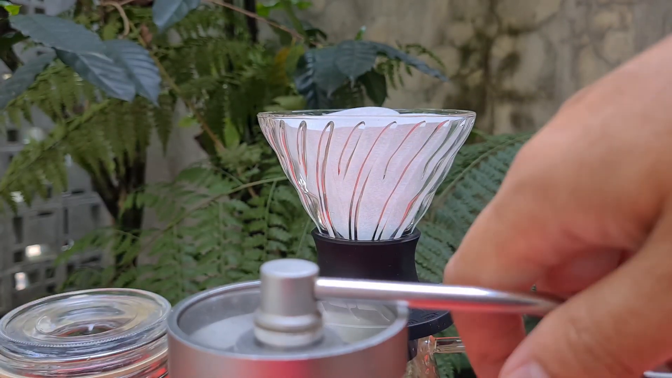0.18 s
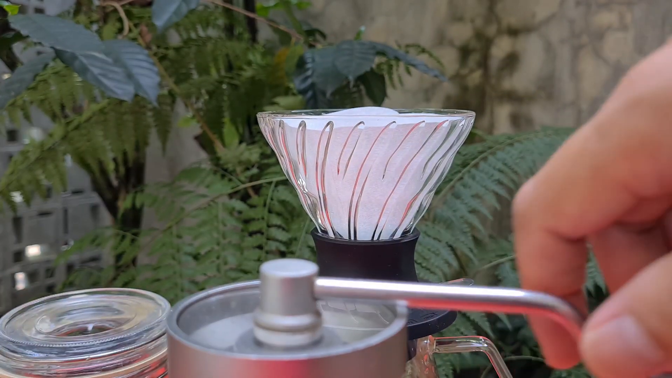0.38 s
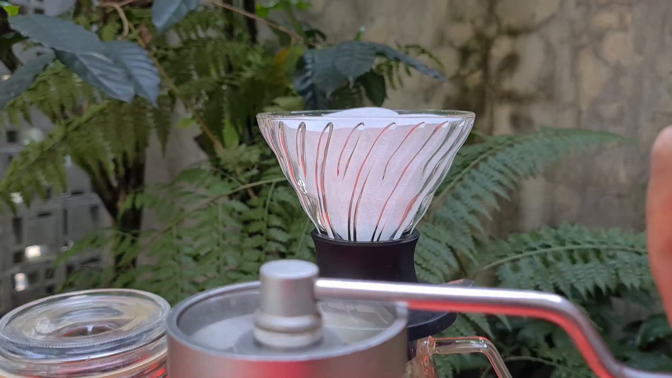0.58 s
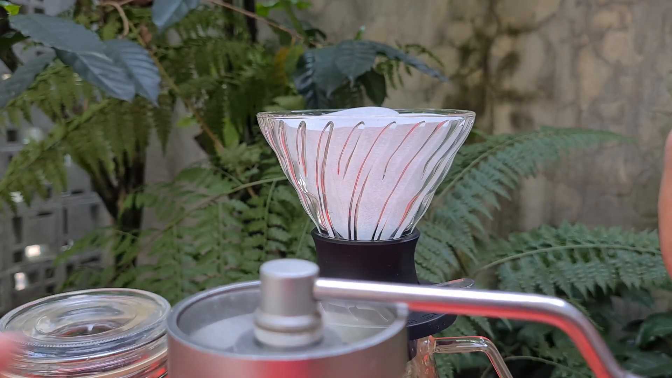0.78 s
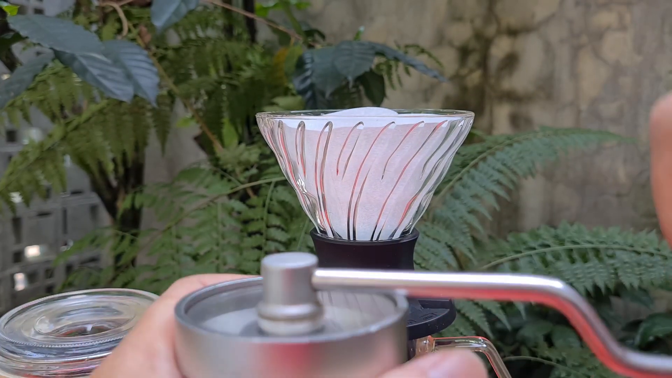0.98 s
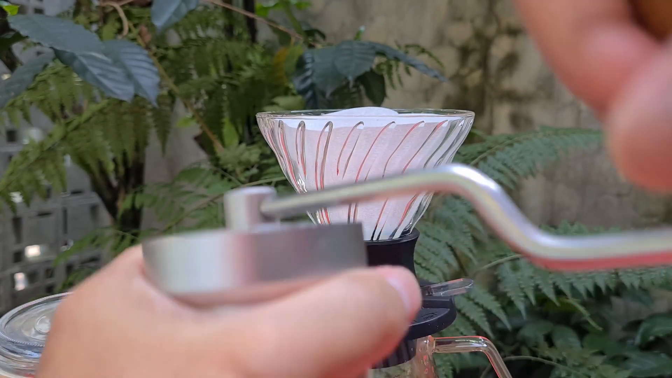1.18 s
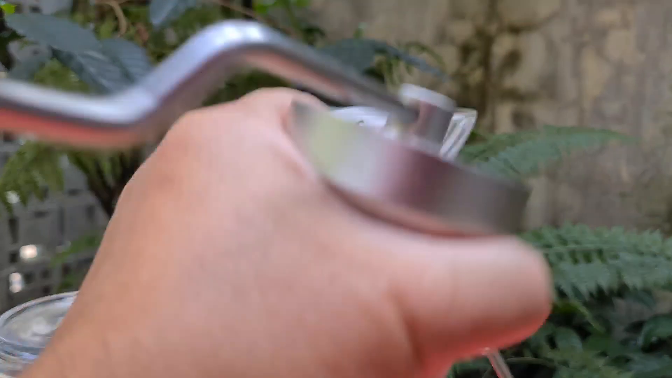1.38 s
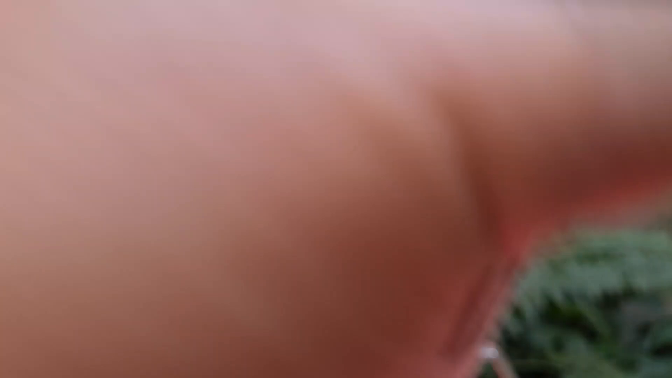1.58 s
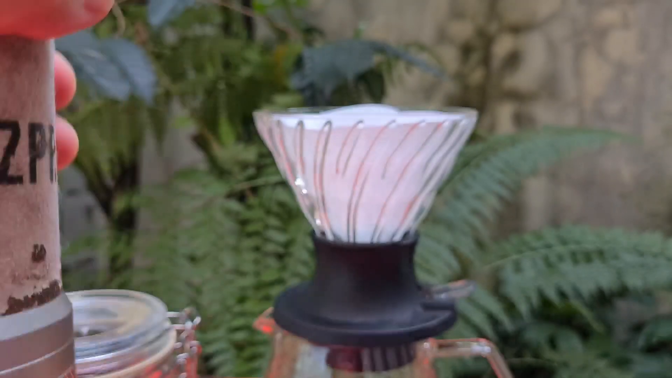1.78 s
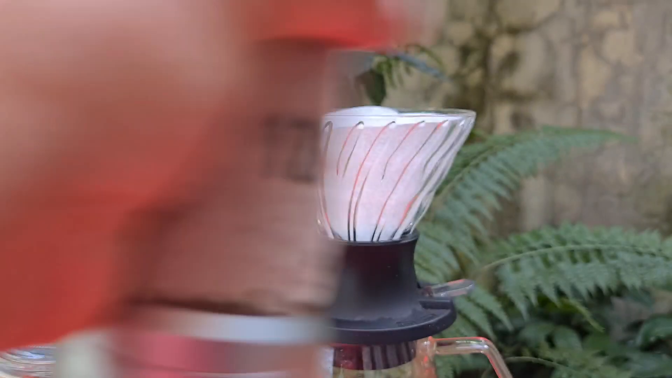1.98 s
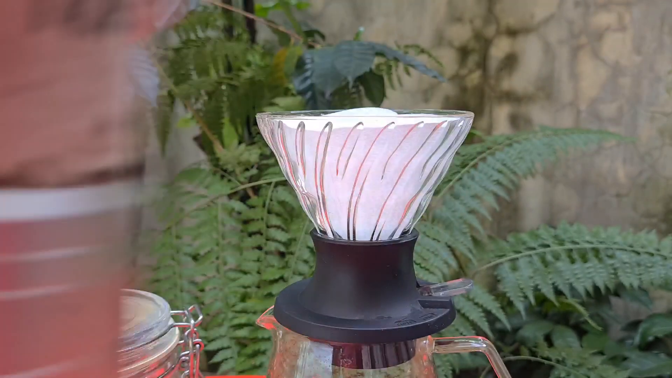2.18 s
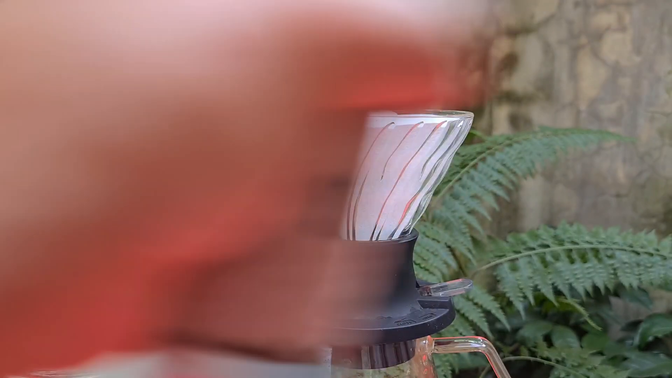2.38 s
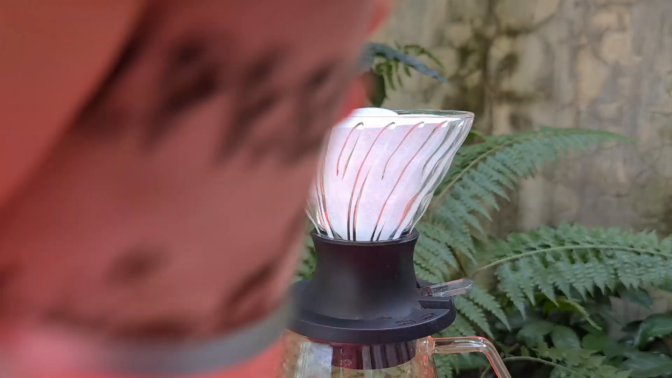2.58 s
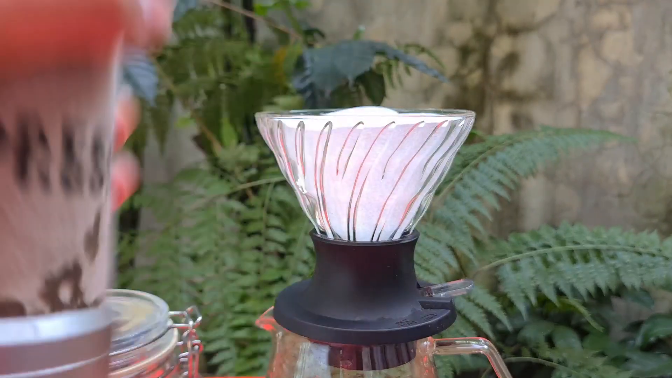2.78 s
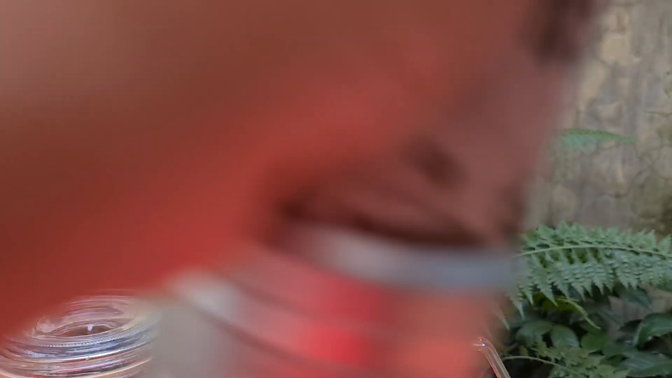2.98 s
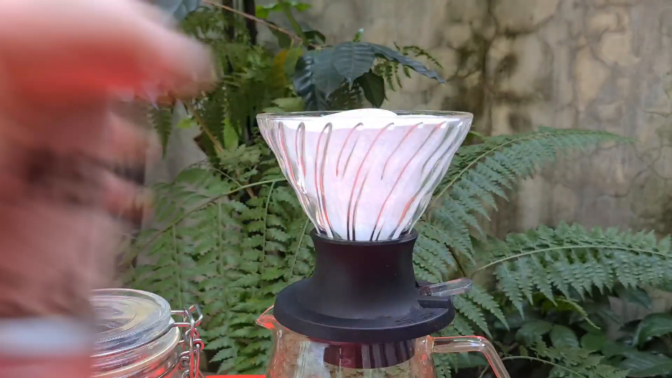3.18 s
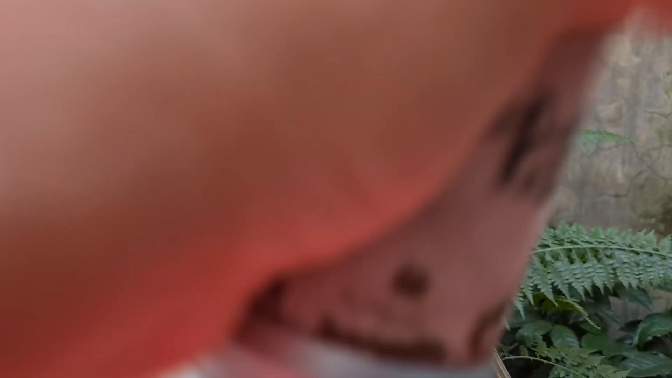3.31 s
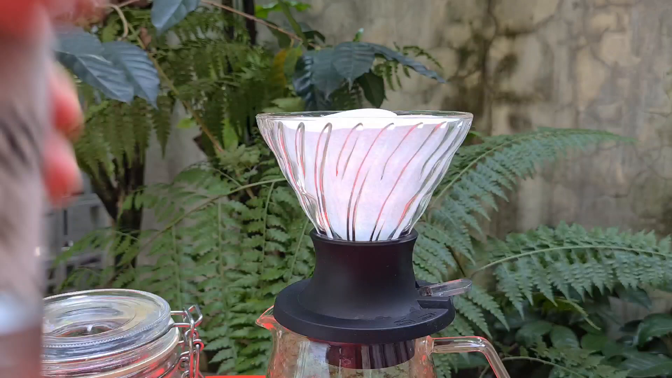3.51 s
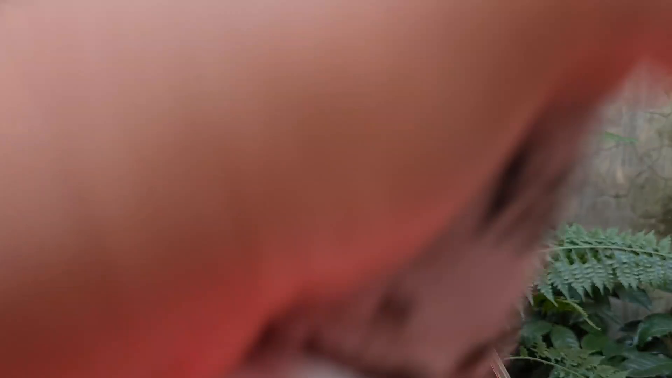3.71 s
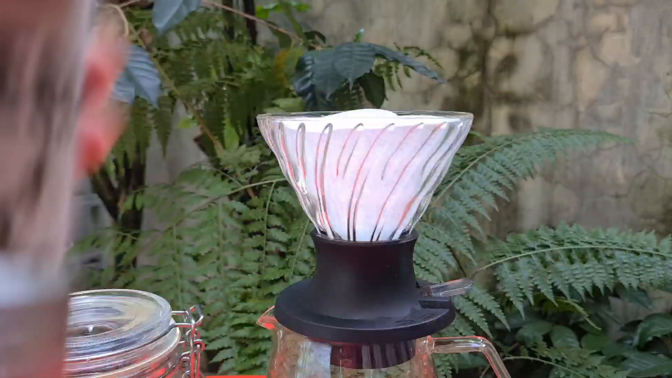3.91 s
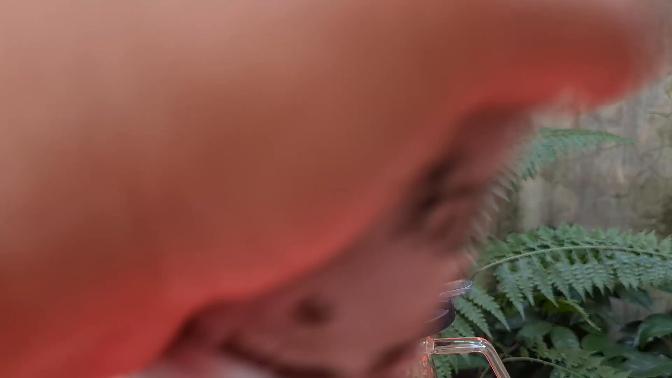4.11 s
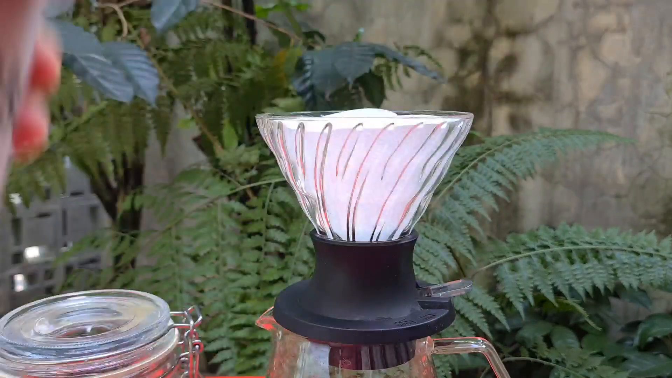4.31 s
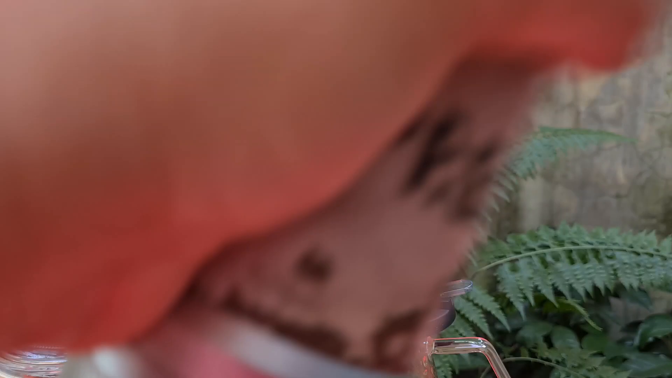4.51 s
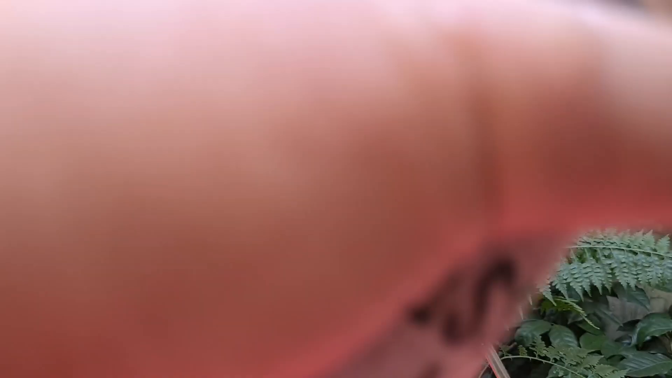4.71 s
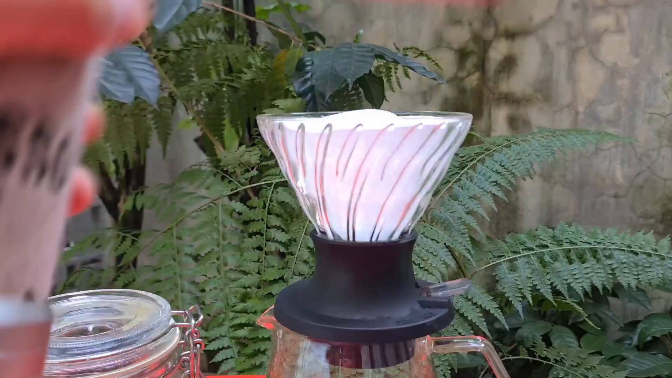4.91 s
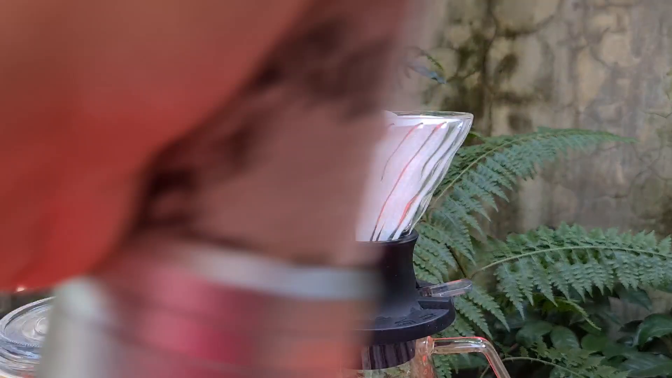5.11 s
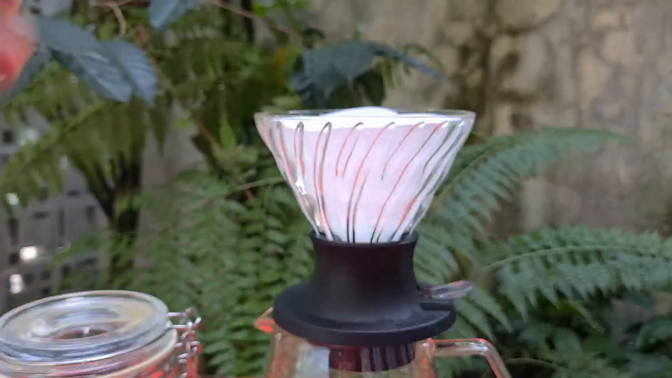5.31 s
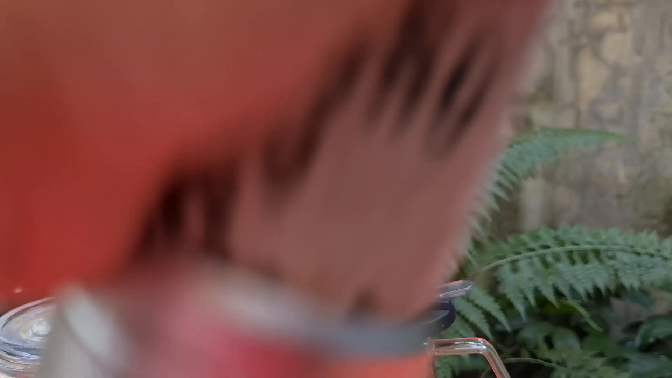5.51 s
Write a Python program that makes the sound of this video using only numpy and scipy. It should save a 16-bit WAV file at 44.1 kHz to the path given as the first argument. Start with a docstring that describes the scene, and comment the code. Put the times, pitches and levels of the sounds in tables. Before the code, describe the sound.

A steel hand grinder is bumped on a table, lifted, then cranked close by, crunching and cracking coffee beans in uneven pushes outdoors.

```python
"""Hand grinder in a garden

A steel hand grinder is lifted off a table and cranked close by: random fractures, as clicks, ring its body.
At each push the axle judders, then beans crunch, spray splinters and snap; the hands add a low shudder and
the crank stalls now and then. Early bumps thud and ring the table's modes, and touches brush the body.
Behind: filtered-noise air, an on-and-off insect as narrow-band clicks, a faint rising sine whistle, echoes."""
import sys
import numpy as np
from scipy import signal
from scipy.fft import rfft, irfft, next_fast_len
from scipy.io import wavfile
from scipy.ndimage import uniform_filter1d, minimum_filter1d

SR = 44100
rng = np.random.default_rng(int(sys.argv[2]) if len(sys.argv) > 2 else 0)


def wrap_up_sound(samples):
    """Save the sound to the file named by the first command line argument, as 16-bit audio."""
    columns = np.atleast_2d(samples).T
    # keep every value between -1 and 1, then stretch to whole-number steps
    tamed = np.clip(columns, -1, 1)
    steps = np.round(tamed * 32767).astype(np.int16)
    wavfile.write(sys.argv[1], SR, steps)


N = 250929
TIME = np.arange(N) / SR


def gain_of(db):
    """Decibels to amplitude."""
    return 10 ** (np.asarray(db) / 20)


def evened(x):
    """Scales to an rms of 1."""
    return x / np.sqrt(np.mean(x ** 2) + 1e-20)


def read(points, hz):
    """Interpolates a table on a log-frequency axis."""
    f, value = np.transpose(points)
    return np.interp(np.log(hz + 1), np.log(f + 1), value)


def add(mix, start_s, sound):
    """Lays a two-channel sound into the mix."""
    part = mix[:, max(round(start_s * SR), 0):][:, :sound.shape[1]]
    part += sound[:, :part.shape[1]]


def colour(x, spectrum, size=4096):
    """Minimum-phase filter with the given spectrum: clicks keep their sharp fronts."""
    hz = abs(np.fft.fftfreq(size, 1 / SR))
    log_gain = np.log(gain_of(read(spectrum, hz)))
    taps = np.fft.ifft(np.exp(signal.hilbert(log_gain).conj())).real[:size // 2]
    return signal.oaconvolve(x, taps[None], axes=1)[:, :x.shape[1]]


def steadied(x, window_s):
    """Holds the mean power near 1, leaving the faster grain alone."""
    size = max(int(window_s * SR), 2)
    power = uniform_filter1d(uniform_filter1d((x ** 2).mean(0), size), size)
    return x / np.sqrt(abs(power) + 1e-12)


def grit(per_s, count=N):
    """Tiny clicks of random size and sign, unrelated between the channels."""
    return rng.standard_normal((2, count)) * (rng.random(count) < per_s / SR)


def swell(peak_s, sigma_s):
    """A Gaussian rise and fall around a moment."""
    return np.exp(-.5 * ((TIME - peak_s) / sigma_s) ** 2)


# phase by which left leads right: f/Hz, lead/rad
LEAD = [(60, 0.098), (400, 0.17), (600, 2.14), (800, 1.9), (1000, 0.28), (1250, 1.26), (1450, 2.74),
        (2600, 2.08), (3100, 4.7), (4000, 9.95), (6000, 12.6)]
# left over right: f/Hz, level/dB
BALANCE = [(50, 5.5), (200, 3), (400, 1.5), (550, 1.3), (700, 5), (950, 4.5), (1220, -0.4), (1700, 2.5),
           (2600, 0.2), (5300, -1.1), (6400, -2.5), (7500, 0.5), (8300, 3.9), (9500, -0.2)]


def ports(x, likeness):
    """Two microphone ports: two unrelated signals are blended by likeness, phase lead and balance."""
    size = next_fast_len(N + 4096)
    a, b = rfft(x, size)
    hz = np.fft.rfftfreq(size, 1 / SR)
    same = np.clip(read(likeness, hz), 0, 1)
    lean = gain_of(read(BALANCE, hz) / 2)
    right = (same * a + np.sqrt(1 - same ** 2) * b) * np.exp(-1j * read(LEAD, hz))
    level = np.sqrt(2 / (lean ** 2 + lean ** -2))
    return irfft(np.array([a * lean, right / lean]) * level, size)[:, :N]


# garden air spectrum, relative: f/Hz, level/dB
GARDEN = [(20, -9), (45, -2), (90, -1.5), (160, .5), (270, -8), (430, -16.5), (700, -21), (1050, -21),
          (1500, -33), (2300, -35), (3100, -29), (5200, -31), (7200, -31.5), (8200, -44), (16000, -47)]
# port likeness of the air: f/Hz, likeness (0 to 1)
GARDEN_LIKENESS = [(130, 0.82), (290, 0.72), (640, 0), (1400, 0)]


def garden_air(level_db=-44.5):
    """Distant rumble and hiss: coloured noise, alike at both ports only in the lows."""
    air = evened(colour(rng.standard_normal((2, N)), GARDEN, size=8192))
    return ports(gain_of(level_db) * air, GARDEN_LIKENESS)


# buzzes, before the insect's gain: start t/s, level/dB
INSECT = [(-.04, -55), (.47, -51.5), (.96, -50.5), (2.52, -53)]


def insect(gain_db=3.0, rise_s=0.061, fade_after_s=0.15, fade_db_per_s=105):
    """A far insect: dense clicks in a narrow band near 6.5 kHz that swell and fade."""
    calls = 0
    for start_s, db in INSECT:
        age_s = TIME - start_s
        fade_db = fade_db_per_s * np.maximum(age_s - fade_after_s, 0)
        calls = calls + np.clip(age_s / rise_s, 0, 1) * gain_of(db - fade_db)
    band = [(5500, -22), (6100, -10), (6450, 3.5), (6650, 1), (6900, -15), (7600, -31)]  # f/Hz, level/dB
    return evened(colour(grit(2600), band)) * gain_of(gain_db) * calls


def walls(x, t60_s=0.21, wet_db=-16):
    """Faint scattered echoes from the table and the garden wall: sparse decaying taps."""
    t = np.arange(SR // 3) / SR
    taps = grit(2400, count=len(t)) * gain_of(-60 * t / t60_s) * (t > .0028)
    taps /= np.linalg.norm(taps, axis=1, keepdims=True)
    return x + gain_of(wet_db) * signal.oaconvolve(x, taps, axes=1)[:, :N]


def whistle(start_s=1.02, end_s=1.3, start_hz=2400, hz_per_s=2300, start_db=-55, db_per_s=82):
    """A faint rising whistle, perhaps a far bird: a swelling sine roughened by slow noise."""
    t = np.clip(TIME, start_s, end_s) - start_s
    sounding = uniform_filter1d(1. * (TIME > start_s) * (TIME < end_s), size=800)
    flutter = evened(uniform_filter1d(uniform_filter1d(rng.standard_normal((2, N)), 200), 130))
    tone = np.sin(2 * np.pi * np.cumsum(start_hz + hz_per_s * t) / SR)
    return sounding * gain_of(start_db + db_per_s * t) * flutter * tone


# bumps on the table: t/s, level/dB (before ring and thud gains), brightness corner f/Hz, click level/dB
BUMPS = [(0.42, -20, 560, -44), (0.4263, -23, 760, -45), (0.5094, -12.5, 1230, -23),
         (0.5155, -17.5, 1010, -30), (0.582, -37, 1200, -31.5)]
# table modes, relative: f/Hz, level/dB, t60/s
TABLE = [(91, 0, .26), (120, -3, .2), (162, 0, .28), (190, -3, .2), (258, -8, .28), (323, -9, .36),
         (352, -9, .26), (453, -5, .2), (613, -10, .12), (744, -11, .12), (1211, -17, .24)]
# thud spectrum, relative: f/Hz, level/dB
THUD = [(30, -20), (80, -4.5), (165, 4), (330, -5), (480, -10), (650, -15), (1200, -23.5), (2500, -60)]


def table_ring(t, corner_hz):
    """Decaying sines at the table's modes, duller for a lower corner."""
    ring = 0
    for k, (hz, level_db, t60_s) in enumerate(TABLE):
        decay = gain_of(level_db - 60 * t / t60_s) / np.hypot(1, hz / corner_hz)
        ring = ring + (-1) ** k * decay * np.sin(2 * np.pi * hz * t)
    return ring


def table(ring_db=-5, thud_db=-5, thud_t60_s=.22, lift_s=1.005, lift_db=-28, lift_hz=77, lift_t60_s=.34):
    """Bumps excite modes, a noise thud and a click; lifting the grinder off leaves a low decaying sine."""
    out, t = np.zeros((2, N)), np.arange(SR // 2) / SR
    click_band = [(150, 0.5), (700, 2.0), (1400, -3.0), (2200, -16),
                  (3300, -13.5), (5000, -34), (15000, -46)]  # f/Hz, level/dB
    for start_s, db, corner_hz, click_db in BUMPS:
        ring = table_ring(t, corner_hz)
        thud = steadied(colour(rng.standard_normal((1, len(t))), THUD), 0.066)
        thud = thud * gain_of(-60 * t / thud_t60_s)
        boom = gain_of(db) * (gain_of(ring_db) * ring + gain_of(thud_db) * thud)
        boom = boom * (1 - np.exp(-t / 0.0037))
        rattle = rng.standard_normal((2, len(t))) * gain_of(-60 * t / .075)
        click = colour(rattle, click_band)
        add(out, start_s, boom + gain_of(click_db) * click / click[:, :SR // 50].std())
    lift = gain_of(lift_db - 60 * t / lift_t60_s) * np.sin(2 * np.pi * lift_hz * t)
    add(out, lift_s, lift * np.ones((2, 1)))
    return out * gain_of([[1.3], [-1.3]])  # left louder


def body(x, modes):
    """Hollow body: air resonances as decaying cosines, band-passed, convolved with the blows."""
    t = np.arange(SR // 10) / SR
    ring = 0
    for hz, width_hz, db in modes:
        ring = ring + gain_of(db) * width_hz * np.exp(-np.pi * width_hz * t) * np.cos(2 * np.pi * hz * t)
    ring = signal.sosfilt(signal.butter(2, [560, 1450], "band", fs=SR, output="sos"), ring)
    return signal.oaconvolve(x, ring[None], axes=1)[:, :x.shape[1]]


# touches of fingers and loose crank: t/s, level/dB (body ring), swell time/s
TAPS = [(0.341, -57, 0.065), (0.916, -52.5, 0.0035), (0.993, -43.5, 0.0065), (1.002, -40, 0.0008),
        (1.103, -46, 0.0065), (1.156, -47, 0.0036), (1.426, -32, .016), (4.676, -51, 0.005)]
# lower and upper air resonances of the body, relative: f/Hz, width/Hz, level/dB
BODY = [(567.7, 45, -8), (937.3, 22, 1.5), (974.7, 51.7, 6)]
UPPER_BODY = [(1103, 42, -5.5), (1189, 71, -4.5)]
# crunching beans' spectrum, relative: f/Hz, level/dB
CRUNCH = [(450, -34), (800, -27), (1300, -4), (1520, 2.5), (1820, 7.5), (2060, 0.5), (2290, 4), (2650, 0.5),
          (3150, -3), (3800, -3), (4700, -4), (5400, -19), (7000, -47.5)]


def handling(scrape_db=-9):
    """Fingers and the loose crank brush the body: swelling grit rings it, with a little scrape."""
    out, t = np.zeros((2, N)), np.arange(SR // 6) / SR
    for start_s, db, swell_s in TAPS:
        rub = grit(7000, count=len(t)) * t * np.exp(-t / swell_s)
        ring = evened(body(rub, BODY + UPPER_BODY))
        scrape = gain_of(scrape_db) * evened(colour(rub, CRUNCH))
        add(out, start_s, gain_of(db) * (ring + scrape))
    return out


# whole-bean snaps, before the gains in snaps(): t/s, crack level/dB, body ring level/dB
SNAPS = [(1.1462, -13.5, -16), (1.1742, -6.5, -4.5), (1.2349, -7.5, -7.5), (1.2774, -6.5, -10),
         (1.2957, -10, -12), (1.3262, -7, -13), (1.3519, -22, -4), (1.4638, -9, -8), (1.478, -8, -8),
         (1.4849, -4, -9), (1.5503, -8, -6.5), (1.7429, -10, -19), (2.1705, -5.5, -20), (2.377, -7, -9.5),
         (2.4626, -7, -10), (2.6834, -9, -12), (2.7054, -11, -8), (2.7581, -5, -19), (2.7684, -3, -22),
         (2.9003, -3, -15), (2.9248, -4, -12.5), (3.2141, -9.5, -13), (3.2715, -7, -18),
         (3.2854, -10, -16.5), (3.3504, -21, -6), (3.9628, -11, -15.5), (4.4029, -14, -19),
         (4.4422, -25, -13), (4.4823, -4.5, -9.5), (4.6963, -14, -13.5), (4.7694, -8.5, -12),
         (4.8457, -8, -22), (5.005, -14, -23.5), (5.214, -9, -10.5), (5.459, -10, -8)]
# spectra of burr chamber, splinters and axle judder, relative: f/Hz, level/dB
CHAMBER = [(1700, -21.5), (2350, -5), (2780, -0.5), (3150, 0.5), (3450, -4), (3900, -19.5), (5500, -35)]
SPLINTERS = [(3500, -34), (4750, -0.5), (5300, 4), (5750, -2), (6050, -0.5), (6500, -4), (7150, -0.5),
             (7850, -6), (8600, -0.5), (9400, -3), (10800, -8.5), (13000, -10), (16000, -19.5)]
JUDDER = [(60, -21), (125, -14), (166, 0), (205, -1), (250, -2), (320, 0.5), (400, -10), (550, -14),
          (700, -20)]


def snaps(ring_db=-9.0, crack_db=-17, jolt_db=-21):
    """Whole beans burst in a few ms of sharp cracks that ring the body and jolt the axle."""
    out, t = np.zeros((2, N)), np.arange(SR // 30) / SR
    crumble = np.exp(-t / .0027) * np.minimum(t / .0004, 1)
    for start_s, crack_level_db, ring_level_db in SNAPS:
        burst = grit(16000, count=len(t)) * crumble
        crack = evened(colour(burst, CRUNCH))
        crack += gain_of(-14) * evened(colour(burst, CHAMBER))
        crack += gain_of(-3.0) * evened(colour(burst, SPLINTERS))
        ring = evened(body(burst, BODY + UPPER_BODY))
        ring += gain_of(jolt_db) * evened(colour(burst, JUDDER))
        snap = gain_of(ring_level_db + ring_db) * ring
        add(out, start_s, snap + gain_of(crack_level_db + crack_db) * evened(crack))
    return out


def fractures(per_s, spread_db, tau_s):
    """Envelope of random breaks of unequal size, each crumbling away exponentially."""
    size = gain_of(spread_db * np.minimum(rng.exponential(1, N), 3.5)) * (rng.random(N) < per_s / SR)
    power = signal.lfilter([1], [1, -np.exp(-2 / (tau_s * SR))], size ** 2)
    return evened(np.sqrt(power))


def shifting(x, depth_db, width_hz, width_s):
    """Each bean sits and breaks differently: time-frequency patches of random gain."""
    z = signal.stft(x, nperseg=512, noverlap=384)[2]
    across = np.exp(-(np.arange(-12, 13) * SR / 512 / width_hz) ** 2)
    along = np.exp(-(np.arange(-40, 41) * 128 / SR / width_s) ** 2)
    noise = rng.standard_normal(z.shape[1:])
    patches = evened(signal.fftconvolve(noise, np.outer(across, along), "same"))
    return signal.istft(z * gain_of(depth_db * patches), nperseg=512, noverlap=384)[1][:, :N]


# stretches in which the crank turns: start t/s, stop t/s
TURNS = [(1.17, 1.378), (1.454, 1.744), (1.771, 2.5), (2.672, 4.543), (4.69, 4.963), (5.008, 5.65)]


def turning(fall_db_per_s, bite_s=0.015):
    """Gain of 1 while the crank turns: quick bite, dying away after each stop."""
    stretches = []
    for start_s, stop_s in TURNS:
        bite = np.clip((TIME - start_s) / bite_s, 0, 1)
        stretches.append(bite * gain_of(-fall_db_per_s * np.maximum(TIME - stop_s, 0)))
    return np.max(stretches, 0)


# pushes on the crank, before the gains in grinding(): t/s, delay to hardest crushing/s, crushing sigma/s,
# crunch level/dB, low ring level/dB, upper ring level/dB, strain in the hands (relative) level/dB
PUSHES = [(1.18, .005, .028, -18, -14.5, -20, -5), (1.3, 0.019, 0.07, -29.5, -18, -23, -3),
          (1.472, 0.046, .1, -24, -15.5, -16, 1.5), (1.71, 0.0046, 0.046, -23.5, -18, -25, -2),
          (1.955, 0.14, 0.061, -25.5, -21.5, -17, 3), (2.37, 0.063, 0.047, -23.5, -22.5, -22, 3),
          (2.72, 0.014, .045, -19.5, -18, -23.5, -1.5), (2.894, 0.094, 0.091, -23.5, -21.5, -22, 0),
          (3.25, .085, 0.089, -22.5, -17.5, -22, 1), (3.66, 0.13, 0.09, -23.5, -22, -26.5, 2),
          (4.04, .097, 0.051, -22, -20, -17.5, 3), (4.44, 0.052, 0.027, -24, -20, -21.5, 0),
          (4.715, 0.032, 0.067, -19.5, -18, -24, -1), (5.08, 0.089, 0.094, -22, -19.5, -22, -1),
          (5.452, 0.092, 0.067, -21.5, -22.5, -22.5, 0)]


def strain(delay_s, sigma_s, peak_db, rest_db, relax_db_per_s=100):
    """Tremor gain: swells around each push, relaxes when the crank stops."""
    power = gain_of(rest_db) ** 2
    for push_s, *_, strain_db in PUSHES:
        power = power + (gain_of(peak_db + strain_db) * swell(push_s + delay_s, sigma_s)) ** 2
    return np.sqrt(power) * turning(relax_db_per_s)


# steady feed between pushes as the burrs fill and empty, before the gains in grinding(): t/s, level/dB
FEED = [(1.2, -39.5), (1.9, -26.5), (2.3, -25), (3.13, -32), (3.48, -23.5), (3.98, -23.5), (4.35, -26),
        (4.95, -30.5), (5.35, -27.5), (5.69, -24)]


def crank_levels(ring_db=2, upper_db=-4, usual_db=-24, splinter_db=-6, splinter_growth_db_per_db=0.79):
    """Gains of low ring, upper ring, crunch and splinters: pushes swell above the steady feed."""
    feed_db = np.interp(TIME, *np.transpose(FEED))
    gains = gain_of([feed_db, feed_db + ring_db, feed_db + upper_db])
    for push_s, delay_s, sigma_s, *peaks_db, _ in PUSHES:
        gains = np.hypot(gains, gain_of(peaks_db)[:, None] * swell(push_s + delay_s, sigma_s))
    crunch, ring, upper = gains
    # splinters stand splinter_db from the crunch when it is at usual_db
    growth = (crunch / gain_of(usual_db)) ** splinter_growth_db_per_db
    splinters = gain_of(usual_db + splinter_db) * growth
    moving = turning(650)
    trickle = gain_of(-13.5) * turning(125)  # grounds still falling after a stop
    falling = np.maximum(moving, trickle)
    return ring * moving, upper * moving, crunch * falling, splinters * falling


# burr chamber resonance near 3 kHz against the plain crunch: t/s, level/dB
SETTLING = [(1.2, -16), (1.55, -23), (1.85, -11), (2.35, -13), (2.75, -8), (3.1, -13), (3.4, -5), (3.7, -3),
            (4.0, -2.5), (4.3, -8), (4.55, 4), (4.72, 1.5), (4.92, -9), (5.3, -13), (5.62, -3.5)]
# low shudder spectrum, relative: f/Hz, level/dB
SHUDDER = [(10, -13.5), (25, -3.5), (48, 5.5), (80, -4.5), (115, -10), (170, -12), (400, -64.5)]
# answer to a push, before strain and gain: delay/s, sigma/s, peak level/dB, rest level/dB
SHUDDER_SWELL = (0.07, 0.07, -34.5, -56)
JUDDER_SWELL = (-0.04, 0.002, -35.5, -49)


def grinding(ring_db=0, upper_db=-.5, crunch_db=2.5, splinter_db=2.0, shudder_db=1, judder_db=3.5):
    """Shared fractures ring the body, crunch, spray splinters and jolt the axle; hands shudder apart."""
    breaks = fractures(per_s=330, spread_db=3.5, tau_s=0.0021)
    force = np.hypot(breaks, gain_of(0.5))  # grounds keep scraping between breaks
    ring, upper, crunch, splinters = crank_levels()

    blows = uniform_filter1d(force, size=130) * grit(5400)  # body swells over a few ms
    out = gain_of(ring_db) * ring * steadied(body(blows, BODY), 0.033)
    out += gain_of(upper_db) * upper * steadied(body(blows, UPPER_BODY), 0.047)
    out = shifting(out, depth_db=3.0, width_hz=102, width_s=0.024)

    cracks = force * grit(5000)
    chamber_gain = gain_of(np.interp(TIME, *np.transpose(SETTLING)))
    coarse = evened(colour(cracks, CRUNCH)) + chamber_gain * evened(colour(cracks, CHAMBER))
    coarse = shifting(coarse, depth_db=3.2, width_hz=130, width_s=0.027)
    out += gain_of(crunch_db) * crunch * steadied(coarse, 0.036)

    fine = colour(force * grit(12500), SPLINTERS)
    fine = shifting(fine, depth_db=3.0, width_hz=170, width_s=0.016)
    out += gain_of(splinter_db) * splinters * steadied(fine, 0.071)

    shudder = steadied(colour(grit(2800), SHUDDER, size=16384), .06)
    out += gain_of(shudder_db) * strain(*SHUDDER_SWELL) * shudder
    judder = steadied(colour(force * grit(1600), JUDDER), .05)
    out += gain_of(judder_db) * strain(*JUDDER_SWELL) * judder
    return out


# port likeness of the grinder: f/Hz, likeness (clipped to 0 to 1)
LIKENESS = [(60, .98), (330, 0.7), (550, 0.8), (660, 0.7), (800, 0.9), (930, 1.2), (1150, 1), (1500, 0.65),
            (2200, 0.24), (3200, 0.22), (5000, 0.06), (15000, 0)]


def scene():
    """Grinder, table and whistle with echoes, over the garden."""
    grinder = ports(grinding() + snaps() + handling(), LIKENESS)
    return walls(grinder + table() + whistle()) + garden_air() + insect()


def record(dry, ceiling=.92, edge_hz=15800):
    """A quick limiter holds the loudest peaks under full scale, then a low-pass limits the band."""
    room_left = np.minimum(1, ceiling / (abs(dry).max(0) + 1e-9))
    held = dry * uniform_filter1d(minimum_filter1d(room_left, size=160), size=160)
    low_pass = signal.firwin(255, edge_hz, window=("kaiser", 9), fs=SR)
    return signal.oaconvolve(held, low_pass[None], "same")


dry = scene()
out = record(dry)
wrap_up_sound(out)
```